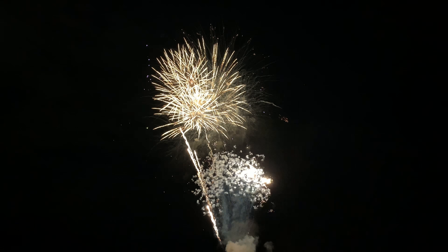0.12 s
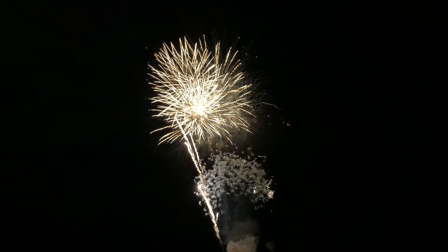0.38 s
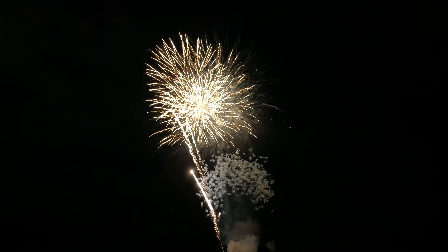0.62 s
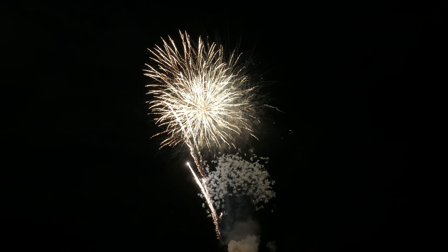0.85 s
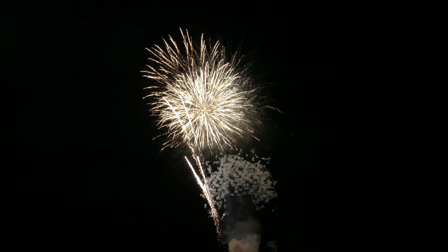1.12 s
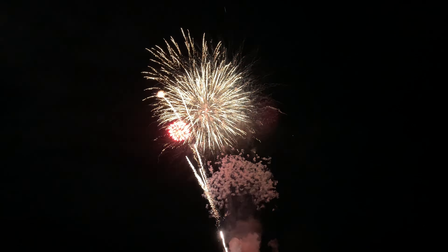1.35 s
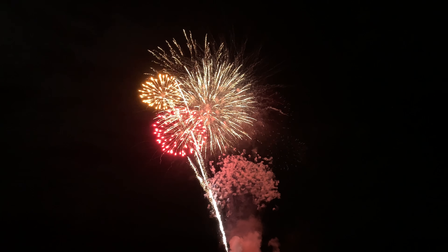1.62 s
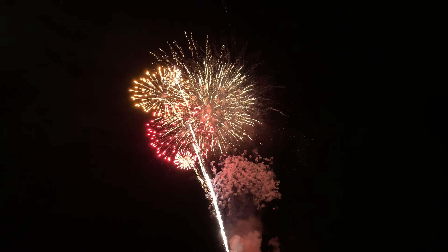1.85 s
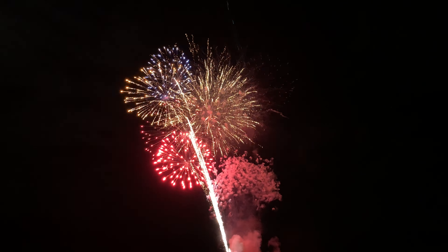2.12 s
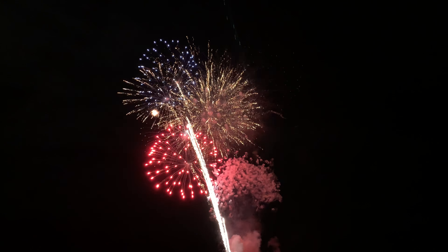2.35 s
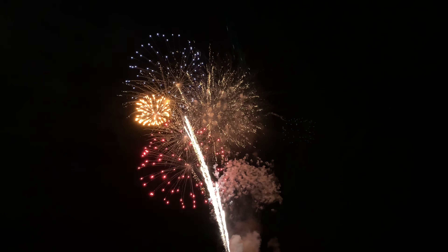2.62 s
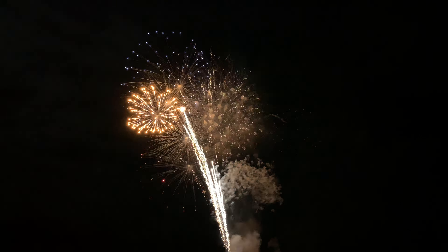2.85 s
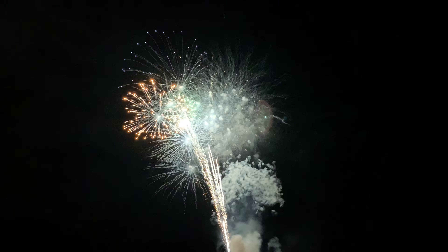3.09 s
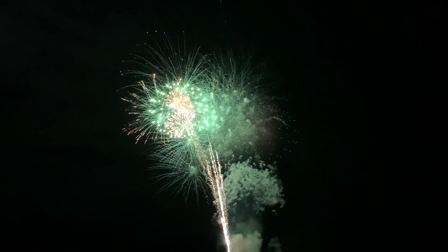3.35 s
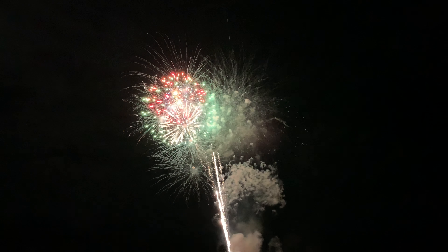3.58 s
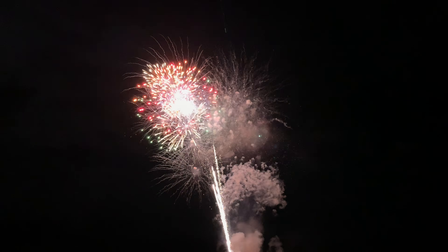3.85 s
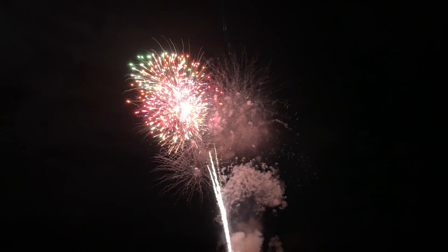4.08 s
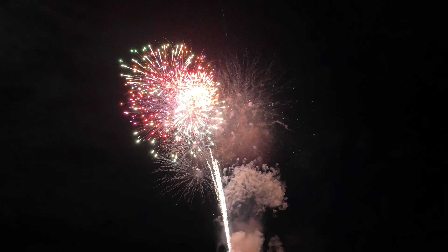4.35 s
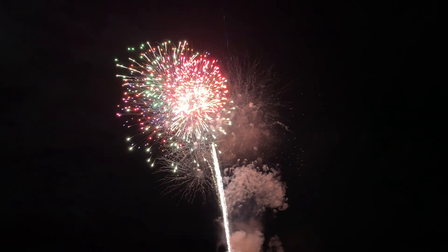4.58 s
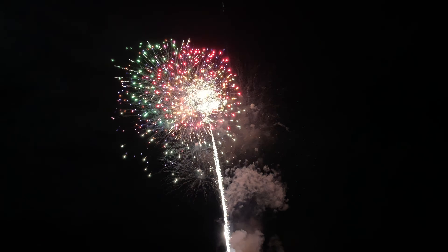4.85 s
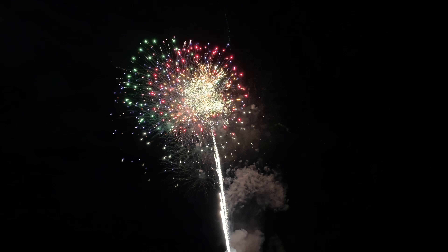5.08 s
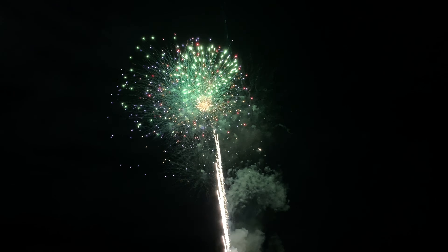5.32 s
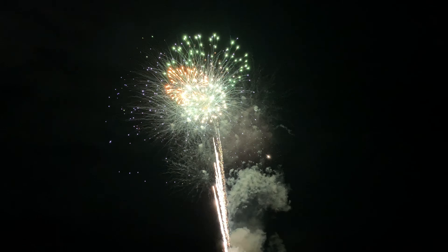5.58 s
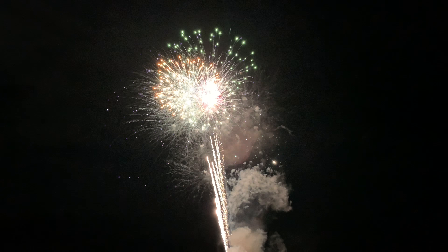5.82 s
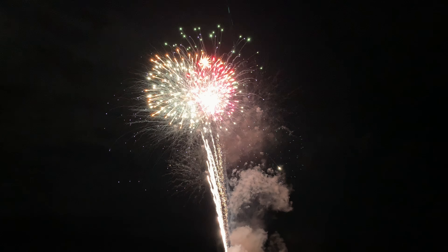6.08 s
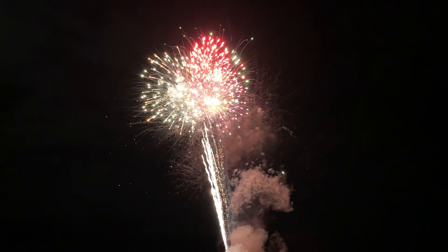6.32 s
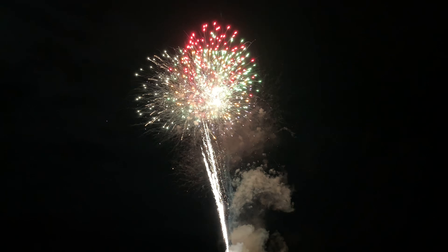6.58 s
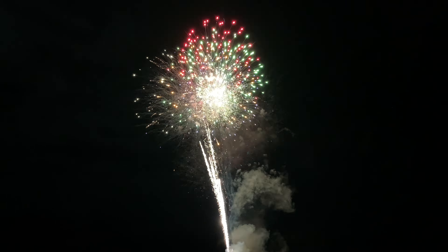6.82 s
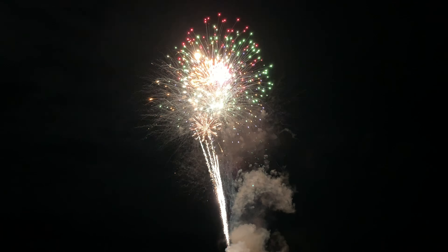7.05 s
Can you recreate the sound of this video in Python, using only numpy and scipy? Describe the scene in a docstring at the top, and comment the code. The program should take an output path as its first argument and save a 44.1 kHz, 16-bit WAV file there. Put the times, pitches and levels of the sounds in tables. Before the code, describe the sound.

Across an open field at night, a rapid volley of small salutes rattles for about a second, thinning as it goes. A sparser stretch of dull mortar thumps and isolated bangs follows, then big shells crowd together in the middle. Later, launch thuds, cracking bursts and fine star crackle overlap. A distant stereo microphone catches short ground echoes, hissing tails and low rolling rumble, with the loudest peaks slightly rounded.

```python
"""A volley of small salutes opens a fireworks finale, heard across an open field at night. Big shells then burst
high up; each bang is a blast wave with a ground echo and a trail of hiss. Dull thuds are mortars lifting new
shells, each with a short tube ring. Noise pops make the crackling stars; echoes of the bangs merge into a wash
and a rumble of noise. The recorder delays the bass behind the treble, so every bang sweeps downward."""
import sys
import numpy as np
from scipy import signal
from scipy.fft import rfft, irfft
from scipy.io import wavfile
from scipy.ndimage import uniform_filter1d

SR = 44100
rng = np.random.default_rng(int(sys.argv[2]) if len(sys.argv) > 2 else 0)


def undo_db(level):
    """Turn decibels back into plain size, where 20 dB means ten times bigger."""
    steps = np.asarray(level, float) / 20
    return 10 ** steps


def materialize(psi):
    """Save the field psi as 16-bit PCM at rate SR to the path in sys.argv[1].

    A 1-D psi becomes a single channel; in a 2-D psi each row is a channel.
    """
    bounded = np.clip(np.atleast_2d(psi).T, -1, 1)
    quanta = np.round(bounded * 32767).astype(np.int16)
    wavfile.write(sys.argv[1], SR, quanta)


N = 317079  # samples in the scene
SIZE = N + 2 ** 15  # filter length, with room for tails
HZ = np.fft.rfftfreq(SIZE, 1 / SR) + 1e-3
SIDES = np.array([[1], [-1]])  # left, right

# big shells: [t/s, blast level/dB, ground echo delay/ms, upward shift of the treble limit/dB]
SHELL_BURSTS = [(0.264, 2, 3.3, 1), (0.2748, -0.0, 3.4, 7.5), (0.3636, 2.5, 3, 11), (0.4895, 1.3, 4, -1.5),
                (0.6635, 0.9, 3.2, -4), (0.9852, 1, 3.38, 7), (0.9915, 1, 3.1, 7), (1.1849, -1, 3.34, 6.5),
                (1.9016, 1.5, 2.76, 5.5), (2.012, -1.9, 3.43, 1.5), (2.3895, 3, 2.22, 2),
                (2.4324, -0.2, 4.1, 2.5), (3.0432, 1, 3.17, 7), (3.6139, 3.5, 3.22, -2),
                (3.8473, 4.5, 2.91, -0.5), (3.9325, 4, 3.24, -2.5), (3.9685, 4.5, 3.28, 0.5),
                (4.2197, 5, 3.22, -4), (4.2587, 3.5, 3.7, 16), (4.2962, 4, 3.2, 11), (4.3876, 4, 3.7, 0.5),
                (4.4327, 2.5, 3.33, 12), (4.4726, 3.5, 3.17, 4.5), (4.613, 3, 3.1, 3.5),
                (4.6245, -3, 3.1, 0.5), (4.7948, 3.5, 3.22, -5.5), (4.839, 5.5, 3.74, -7.5),
                (4.8625, 3.5, 3.4, 5.5), (4.9549, 4, 3.77, 1), (5.6267, 3.5, 3.65, 13),
                (5.8791, 3, 3.24, 7), (6.0332, 3.5, 3.72, 8.5), (6.2456, 3, 3.47, 4.5),
                (6.3756, 5, 3.17, 3.5), (6.386, 1.5, 3.6, 9.5), (6.5426, 4, 3.2, -2),
                (6.559, 3.5, 3.76, 4.5), (6.5648, -2.5, 3.26, 15), (6.7856, 5.5, 4.02, -3.5),
                (6.8958, 4.5, 3.25, 7)]
# small salutes, lower in the sky: [t/s, blast level/dB, ground echo delay/ms]
SALUTE_BURSTS = [(0.0003, -4.5, 2.2), (0.0092, -4, 2.7), (0.0119, -2, 2.5), (0.0235, -2.5, 1.94),
                 (0.0535, 0.5, 2), (0.0575, -0.5, 1.7), (0.0624, -2, 2.2), (0.0718, 2, 1.75),
                 (0.0798, 1.5, 1.87), (0.0883, -1.5, 2.53), (0.096, -2, 1.5), (0.1136, 1.5, 1.57),
                 (0.1222, -1.5, 1.5), (0.1386, 1.5, 1.75), (0.1597, -0.5, 2.3), (0.1689, -2.5, 1.5),
                 (0.1776, -3, 1.65), (0.1806, 2.5, 1.86), (0.187, -4.5, 1.9), (0.1946, 0, 1.9),
                 (0.2066, -4.5, 2), (0.2125, -2.5, 2.7), (0.217, 0.5, 1.5), (0.222, 0.5, 2.36),
                 (0.232, -3, 2.3), (0.2357, 4, 1.33), (0.239, -0.5, 2.4), (0.248, -2, 2.8),
                 (0.2907, -1.5, 2), (0.308, -2, 1.73), (0.3233, 1.5, 1.84), (0.3265, -2, 1.4),
                 (0.3509, 4.5, 1.66), (0.3677, -3, 2.2), (0.3926, -3, 2.15), (0.3964, -3, 2.1),
                 (0.4053, -4, 2), (0.4087, -1.5, 1.75), (0.421, -2.5, 2.36), (0.426, -4, 1.8),
                 (0.463, -1, 1.77), (0.4775, -3, 1.54), (0.5134, -3, 1.3), (0.5256, 0.5, 1.64),
                 (0.529, -2.5, 1.4), (0.5509, 3, 2), (0.5576, -1.2, 2.07), (0.5635, -2.5, 2.9),
                 (0.5822, -7, 1.4), (0.597, -2.9, 2.5), (0.6123, -9.5, 1.35), (0.6463, -13, 1.5),
                 (0.6495, -1.5, 1.35), (0.687, -2.5, 1.9), (0.6969, -3, 1.7), (0.7126, -1.5, 1.57),
                 (0.718, -5.5, 2.1), (0.7383, -5, 2.3), (0.759, -1, 1.43), (0.765, -6.5, 1.54),
                 (0.784, -4, 2), (0.829, -2.5, 1.63), (0.8589, -5.5, 1.67), (0.8802, -1, 1.57),
                 (0.904, -5, 2.06), (0.961, -4.5, 1.53), (1.0736, 1.4, 1.8), (1.0956, -2.5, 1.56),
                 (1.1255, -3.5, 1.57), (1.1711, -3.5, 2.4)]
# mortar lift charges: [t/s, blast level/dB before the treble and bass are cut]
LIFT_CHARGES = [(1.0568, 7), (1.3441, 3.5), (1.713, 5), (1.813, 11), (2.066, 12.5), (2.1499, 9.5),
                (2.2032, 1.5), (2.262, 12), (2.502, 8), (2.515, 9.5), (2.6017, 7), (2.715, 10), (2.87, 11),
                (3.4198, 16.5), (3.5898, 12.5), (3.7523, 15.5), (3.8767, 10), (4.0657, 12.5), (4.194, 13),
                (4.354, 15), (4.5116, 8), (4.684, 10.5), (4.879, 11.5), (4.9153, -2), (5.1315, 8.5),
                (5.2042, 14.5), (5.2197, 11.5), (5.4042, 15.5), (5.573, 14), (5.604, 13), (5.7068, -1),
                (5.7477, 16.5), (5.7999, 15), (5.8551, 16), (6.0576, 12.5), (6.0753, 10), (6.1267, 16),
                (6.137, 4), (6.2333, 10.5), (6.413, 8), (6.4353, 10), (6.6404, -3), (6.8104, 14),
                (6.831, 11), (6.9348, 10), (7.07, 12)]
# blast shapes: [decay/ms, treble limit f/Hz before any brightness shift, echo share as a factor,
#   echo dullness f/Hz, bass knee f/Hz, knee Q, hiss level/dB before filtering,
#   hiss t60/s, hiss top f/Hz before any brightness shift]
SHELL_SHAPE = (21, 5496, 0.9036, 1228, 240, 1.32, -17.5, 0.07, 1505)
SALUTE_SHAPE = (2, 5998, 1.04, 606, 328, 1.32, -13.5, 0.04, 4000)
# the lift blast is split in two: the first six columns above, then the three for hiss
LIFT_SHAPE = (4.8, 90., .44, 4700., 231., 1.33)
LIFT_HISS_SHAPE = (-45, 0.1, 1640)
LIFT_ECHO_MS = 3.0
# short modes of the mortar tube: [f/Hz, level against the listed lift level/dB, t60/s]
TUBE_MODES = [(905, -40.5, 0.009), (2200, -56.5, 0.015), (4620, -60, 0.014)]
# trees and buildings scatter the bangs back: [delay/ms, t60/s, level/dB, low f/Hz, high f/Hz]
SCATTERERS = [(1.54, 0.014, -18, 720, 6000), (18.9, 0.12, -27.5, 770, 6900), (27.5, 0.26, -37.5, 42, 10000)]
# showers of crackling stars: [start t/s, length/s, level/dB before flicker and body, fade while burning/dB per s]
STAR_SHOWERS = [(5.362, 0.48, -38, 28), (6.147, 1.15, -46, 1)]
# spectra of the crackle, the echo wash and the rumble: [f/Hz, relative level per Hz/dB]
CRACKLE_SPECTRUM = [(240, -54), (500, 3.5), (800, 3), (1100, 1.5), (1600, -3.5), (2400, -2.5), (3300, -3),
                    (4400, -9), (5200, -13), (8300, -25.5), (10000, -46), (11500, -87)]
WASH_SPECTRUM = [(240, -30), (420, 5), (1000, -8), (1700, -12), (2500, -12.5), (5000, -23), (9000, -44),
                 (11000, -88)]
RUMBLE_SPECTRUM = [(12, -42), (20, -16.5), (59, 2), (155, -2.5), (225, -6), (325, -2), (414, -37.5),
                   (600, -15), (780, -44), (1320, -120)]
# far echoes: [level against the power of the bangs/dB, build-up/s, t60/s, steady level/dB,
#   level of bangs just before the start/dB, before the first column lowers it]
WASH_ECHO_SETTINGS = (-31.5, 0.2, 3.5, -63, -5.5)
RUMBLE_ECHO_SETTINGS = (-20, 0.03, 1.2, -48, -14)
# the recorder's phase-turning filter sections: [f/Hz, Q]
PHASE_TURNS = [(120., 1.1), (181., .09), (526., 1.56), (940., .14), (1461., .95)]
# the recorder's colour: [f/Hz, level/dB]
MIC_COLOUR = [(400, 1.5), (560, -7.5), (800, 3.5), (1150, -0.5), (1600, 4), (2350, 2), (2850, -1),
              (3400, 1), (4500, 0), (6000, 5.5), (8000, 6), (9300, 10.5), (10500, 5), (12000, 8),
              (14500, 4), (16400, -3)]
# phase between the two ports: [f/Hz, lead of the left/rad, faded out below 200 Hz in record()]
PORT_PHASE = [(0, 0), (1550, 0.2), (1810, 1.6), (2150, 6.5), (2670, 8.2), (4310, 6.9), (5770, 8.9),
              (6370, 8.6), (6890, 7.0), (9820, 3.6), (11400, 2.7), (12500, 0.8), (15600, -1.4),
              (16200, -1.9)]
# level between the two ports: [f/Hz, left minus right level/dB]
PORT_BALANCE = [(60, 0.5), (110, -1), (200, -0.5), (380, -0.2), (700, 0.9), (1290, 1.0), (2380, 1.5),
                (4400, -2), (8120, -1), (15000, 1)]
TOP_HZ = 16600  # the recorder passes nothing above this

# the salutes dull as the volley goes on, each a little unlike the next
SALUTE_BRIGHT_DB, SALUTE_DULLING_DB_PER_S, SALUTE_SPREAD_DB = -0.64, 2, 1.5
STARS_CATCH_S, STARS_DIE_S = 0.18, 0.063
APART_TOP_HZ = 6500  # the hiss differs at the two ports mainly below this


def read(table, hz=HZ):
    """Reads a (frequency, value) table at every frequency, joined on a log axis."""
    at, value = np.transpose(table)
    return np.interp(np.log(hz), np.log(at + 1), value)


def coloured(x, table):
    """Filters x by the curve of a table and brings it to rms 1."""
    y = irfft(rfft(x, SIZE) * undo_db(read(table)), SIZE)[..., :N]
    return y / y.std()


def walk(rate):
    """A smooth random curve: values held for 1 / rate seconds, slewed twice; its rms is about 1.5."""
    hold = int(SR / rate)
    steps = np.repeat(rng.standard_normal(N // hold + 1), hold)
    return 2.05 * uniform_filter1d(uniform_filter1d(steps, hold), hold)[:N]


def echo_level(bangs, echo):
    """Level in dB of echoes that build up after every bang and die away onto a steady bed."""
    below_db, build_s, t60, steady_db, before_db = echo
    t = np.arange(N) / SR
    fade = np.exp(-2 * np.log(1000) * t / t60)  # doubled, as it acts on power
    reply = fade * (1 - np.exp(-t / build_s))
    power = signal.fftconvolve(np.mean(bangs ** 2, axis=0), reply / reply.sum())[:N]
    power = power + undo_db(before_db) ** 2 * fade
    return 10 * np.log10(undo_db(below_db) ** 2 * np.abs(power) + undo_db(steady_db) ** 2)


def roll(db, spectrum, wide, swell, rate):
    """Far echoes merge into noise that rolls in uneven swells; swell is dB per unit of walk()."""
    mid, side = coloured(rng.standard_normal((2, N)), spectrum)
    return undo_db(db + swell * walk(rate)) * (mid + wide * side * SIDES)


def showers():
    """Level in dB of the stars: each shower catches light, burns down and dies out."""
    t, gain = np.arange(N) / SR, 1e-6
    for start, length, db, fade_db in STAR_SHOWERS:
        catch = np.clip((t - start) / STARS_CATCH_S, 0, 1) ** 1.05
        die = np.clip((start + length - t) / STARS_DIE_S, 0, 1)
        burn = undo_db(db - fade_db * np.maximum(t - start - STARS_CATCH_S, 0))
        gain = gain + catch * die * burn
    return 20 * np.log10(gain)


def crackle(db, body_db, per_s=4500., spread=1.8, wide=0.3):
    """Thousands of tiny star pops a second, of uneven size, spread left and right, with a flickering level."""
    happens = rng.random((2, N)) < per_s / SR
    pops = happens * rng.standard_normal((2, N))
    pops = pops * undo_db(spread * rng.exponential(size=(2, N)))
    small = coloured(pops, CRACKLE_SPECTRUM)
    # a band of the same pops, added on top, gives them body
    band = signal.butter(1, [1100., 2600.], "bandpass", fs=SR, output="sos")
    mid, side = small + undo_db(body_db) * signal.sosfilt(band, small)
    return undo_db(db + 1.3 * walk(30.)) * (mid + wide * side * SIDES)


def scatter(bangs):
    """Trees and buildings return fading swarms of echoes, unlike at the two ports."""
    t = np.arange(SR) / SR
    reply = 0
    for delay_ms, t60, db, low_hz, high_hz in SCATTERERS:
        fade = np.exp(-np.log(1000) * t / t60)
        swarm = rng.standard_normal((2, SR)) * (t > delay_ms / 1000) * fade
        # the echoes arrive in clumps
        swarm = swarm * undo_db(3.5 * walk(95.7)[:SR])
        band = signal.butter(2, [low_hz, high_hz], "bandpass", fs=SR, output="sos")
        swarm = signal.sosfilt(band, swarm)
        reply = reply + undo_db(db) * swarm / np.sqrt(np.sum(swarm ** 2, axis=1, keepdims=True))
    return signal.fftconvolve(bangs.mean(axis=0, keepdims=True), reply, axes=1)[:, :N]


def tube(s, db):
    """Every lift charge strikes a few short decaying sine modes of the mortar tube."""
    t = np.arange(SR // 10) / SR
    ring = 0
    for hz, ring_db, t60 in TUBE_MODES:
        ring = ring + undo_db(ring_db) * np.sin(2 * np.pi * hz * t) * np.exp(-np.log(1000) * t / t60)
    strikes = np.bincount((s * SR).astype(int), undo_db(db), N)
    return signal.fftconvolve(strikes, ring)[:N]


def blasts(s, db, echo_ms, bright_db, shape, spread_ms):
    """Pressure jumps, decays and undershoots; the ground returns a duller copy; turbulence trails a ragged hiss."""
    decay_ms, loss_hz, share, dull_hz, knee_hz, q, rag_db, rag_t60, rag_hz = shape
    size = 4096  # samples per bang
    hz, t = np.fft.rfftfreq(size, 1 / SR), np.arange(size) / SR
    jw, knee = 2j * np.pi * hz, 1j * hz / knee_hz
    thin = knee ** 2 / (knee ** 2 + knee / q + 1)  # cuts the bass below the knee
    out = np.zeros((2, N + 2 * size))
    for k in range(len(s)):
        i = int(s[k] * SR) - 64  # starts a little early, to leave room before the jump
        wave = SR * jw / (jw + 1000 / decay_ms) ** 2
        wave = wave / (1 + 1j * hz / (loss_hz * undo_db(bright_db[k]))) ** 2
        wave = wave * (1 + share * np.exp(-jw * echo_ms[k] / 1000) / (1 + 1j * hz / dull_hz))
        # the hiss comes in clumps about 1.5 ms long
        clumps = undo_db(5.95 * np.repeat(rng.standard_normal(64), 64))
        ragged = np.exp(-np.log(1000) * t / rag_t60) * clumps
        near, apart = rfft(rng.standard_normal((2, size)) * ragged)
        rag = near + 0.39 * apart * SIDES / (1 + (hz / APART_TOP_HZ) ** 8)
        rag = undo_db(rag_db) * rag / (1 + 1j * hz / 3100.0) ** 2
        rag = rag / (1 + 1j * hz / (rag_hz * undo_db(0.31 * bright_db[k])))
        # each bang comes from its own bearing, so one port hears it a little sooner
        delay = s[k] - i / SR + spread_ms / 1000 * rng.standard_normal() * SIDES / 2
        bang = irfft((wave + rag) * thin * np.exp(-jw * delay))
        out[:, size + i:2 * size + i] += undo_db(db[k]) * bang
    return out[:, size:size + N]


def scene():
    """Adds up the bangs, their scattered echoes, the crackling stars and the background."""
    s, db, echo_ms, bright_db = np.transpose(SHELL_BURSTS)
    aloft = blasts(s, db, echo_ms, bright_db, SHELL_SHAPE, spread_ms=0.0061)
    s, db, echo_ms = np.transpose(SALUTE_BURSTS)
    bright_db = SALUTE_BRIGHT_DB - SALUTE_DULLING_DB_PER_S * s
    bright_db = bright_db + SALUTE_SPREAD_DB * rng.standard_normal(len(s))
    aloft = aloft + blasts(s, db, echo_ms, bright_db, SALUTE_SHAPE, spread_ms=0.013)
    s, db = np.transpose(LIFT_CHARGES)
    lifts = blasts(s, db, LIFT_ECHO_MS + 0 * s, 0 * s, LIFT_SHAPE + LIFT_HISS_SHAPE, spread_ms=0.015)
    bangs = aloft + lifts + tube(s, db)
    wash = roll(echo_level(aloft, WASH_ECHO_SETTINGS), WASH_SPECTRUM, wide=1.0, swell=1.5, rate=14.)
    rumble = roll(echo_level(bangs, RUMBLE_ECHO_SETTINGS), RUMBLE_SPECTRUM, wide=0.093, swell=2.2, rate=20.)
    stars = crackle(showers(), body_db=-3.5)
    return bangs + scatter(bangs) + wash + rumble + stars


def band_limit(x):
    """A steep low-pass at the top of the band."""
    return signal.sosfilt(signal.butter(12, 16650, fs=SR, output="sos"), x)


def record(dry):
    """The ports differ in phase and level; filter sections delay the bass; the loudest peaks are rounded off."""
    lead = read(PORT_PHASE) * np.minimum(HZ / 200, 1)
    gain = undo_db(read(MIC_COLOUR) + SIDES * read(PORT_BALANCE) / 2) * (HZ < TOP_HZ)
    gain = gain * np.exp(1j * (SIDES - 1) / 2 * lead)  # turns the right port only
    for hz, q in PHASE_TURNS:
        z = 1j * HZ / hz
        gain = gain * (z ** 2 - z / q + 1) / (z ** 2 + z / q + 1)
    heard = irfft(rfft(dry, SIZE) * gain, SIZE)[:, :N]
    rounded = heard / (1 + np.abs(heard) ** 8) ** (1 / 8)
    return band_limit(rounded)


dry = scene()
out = record(dry)
materialize(out)
```